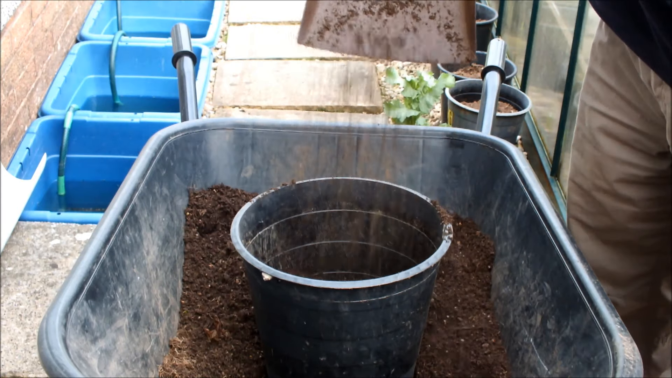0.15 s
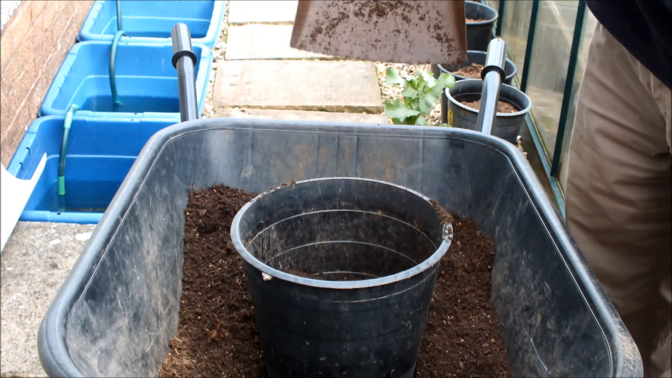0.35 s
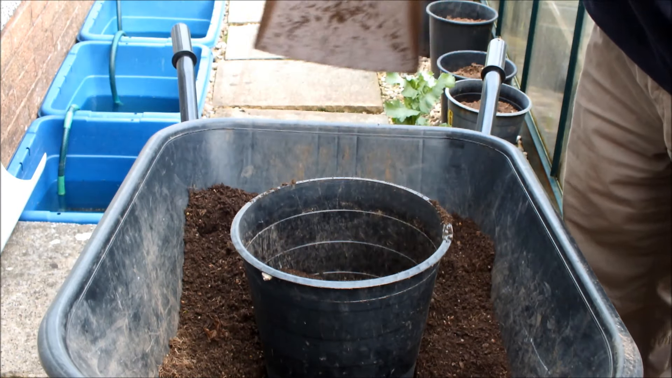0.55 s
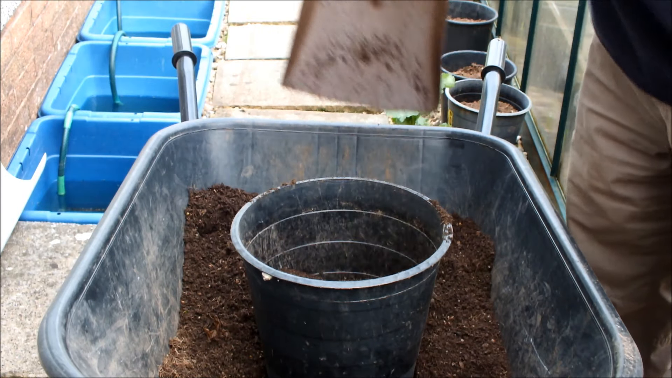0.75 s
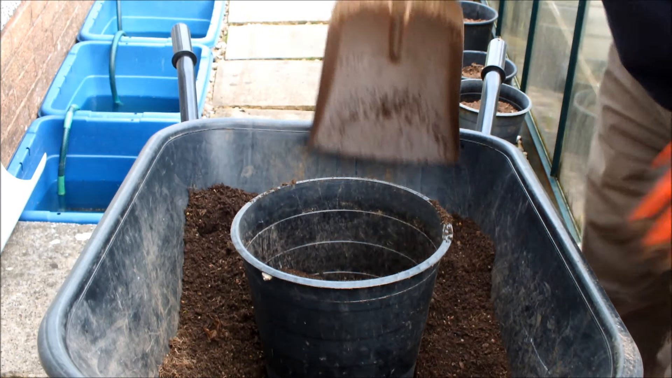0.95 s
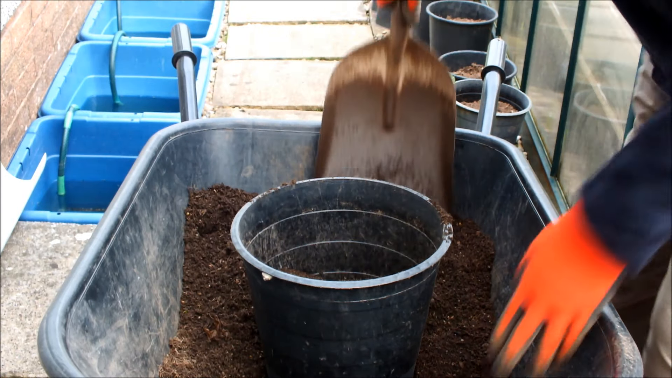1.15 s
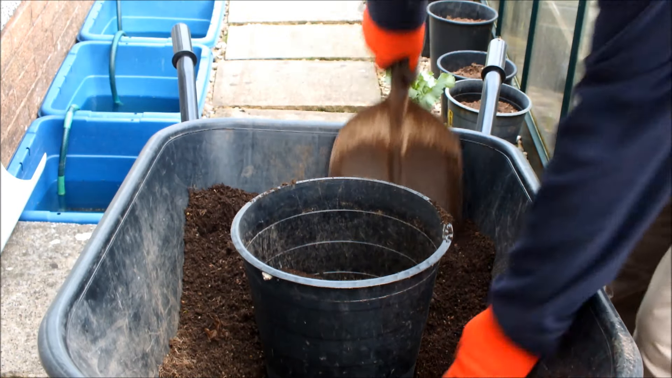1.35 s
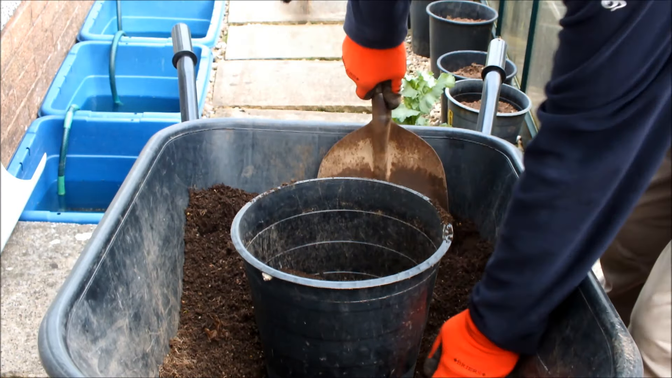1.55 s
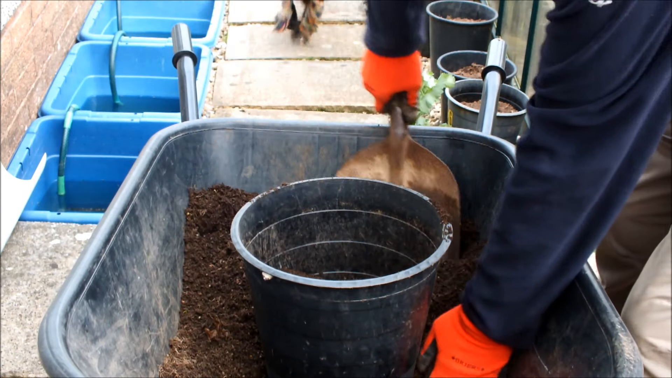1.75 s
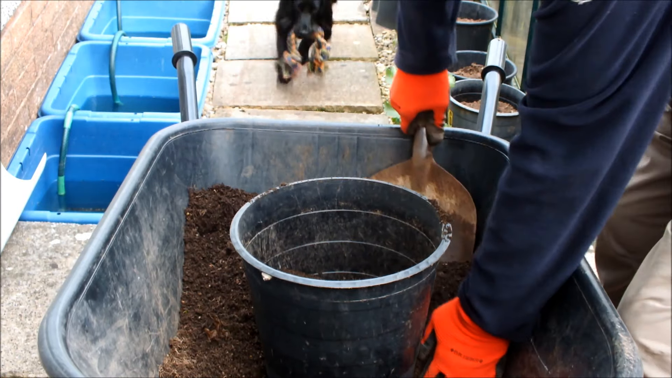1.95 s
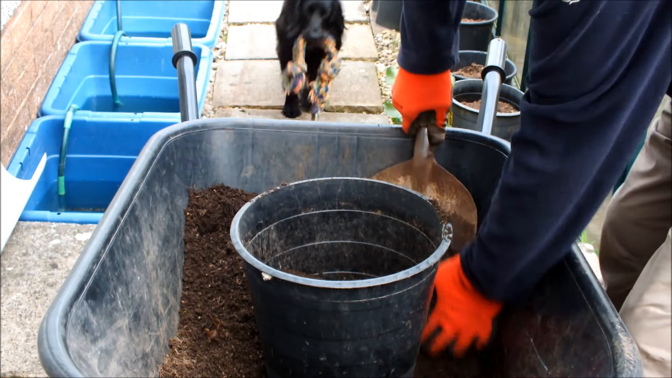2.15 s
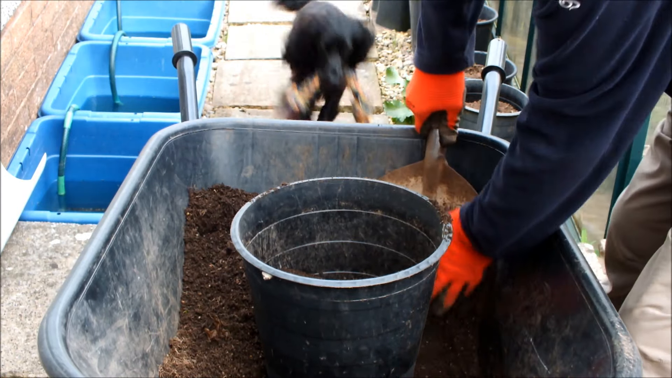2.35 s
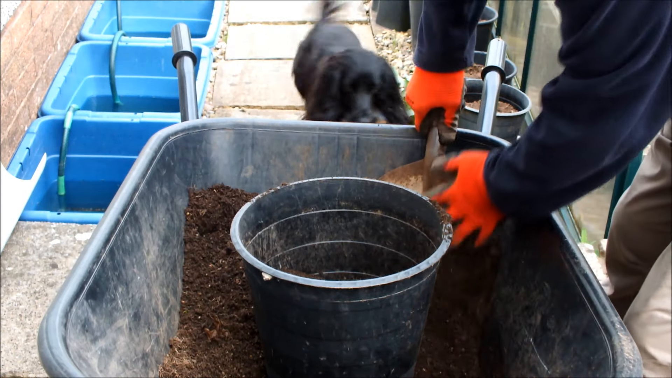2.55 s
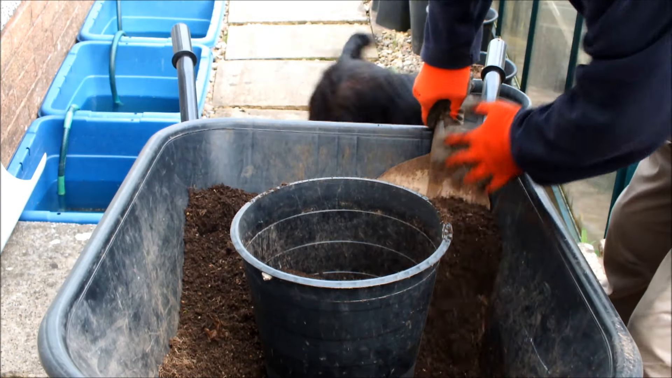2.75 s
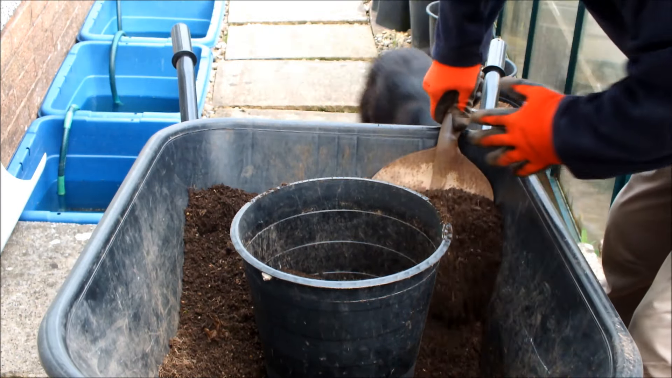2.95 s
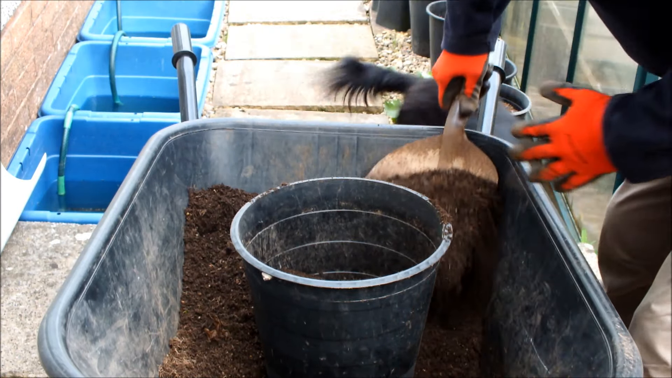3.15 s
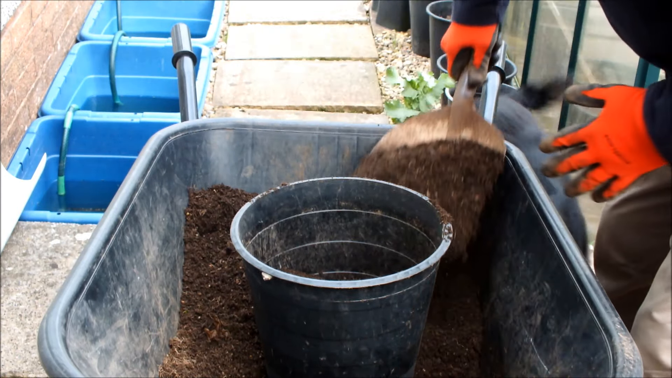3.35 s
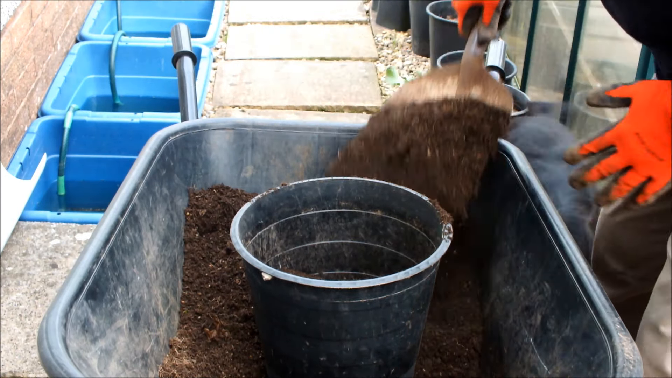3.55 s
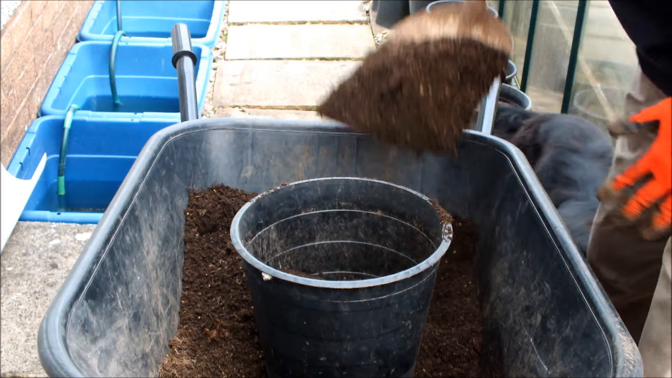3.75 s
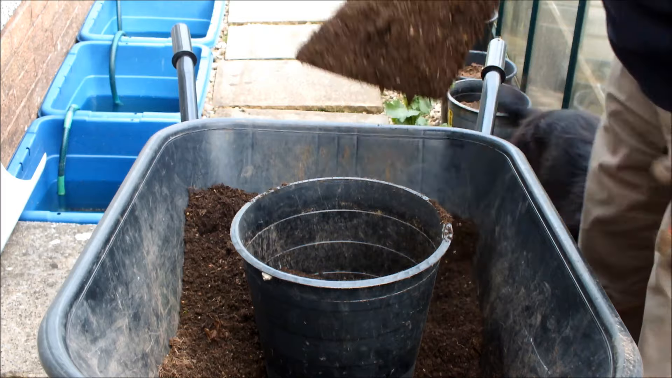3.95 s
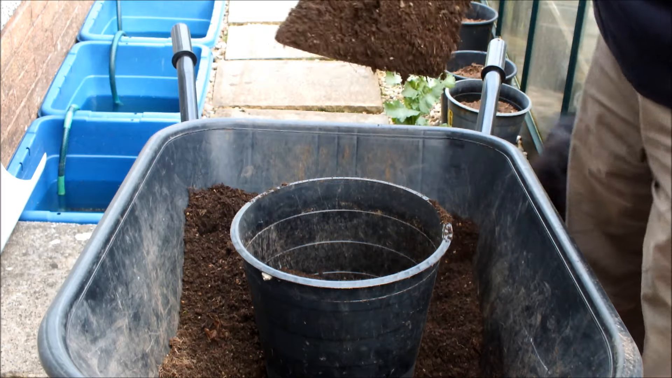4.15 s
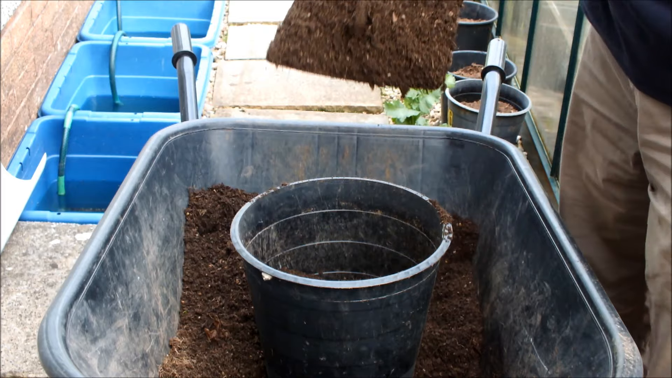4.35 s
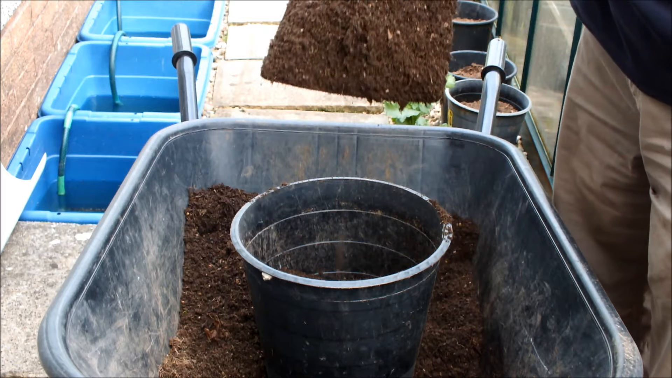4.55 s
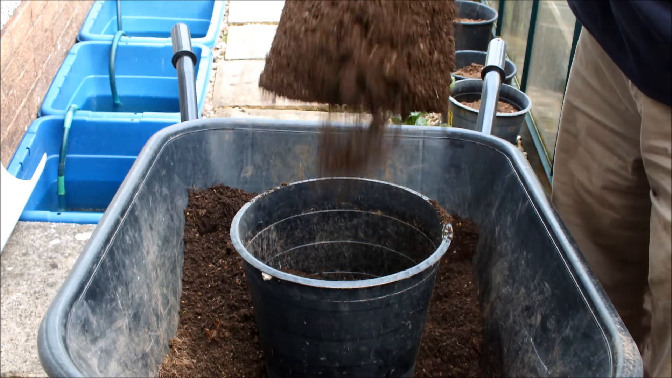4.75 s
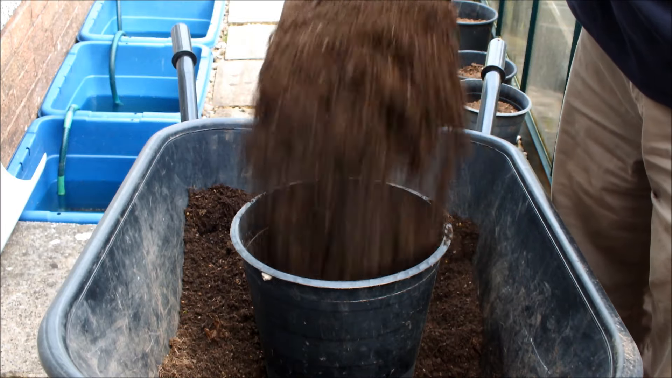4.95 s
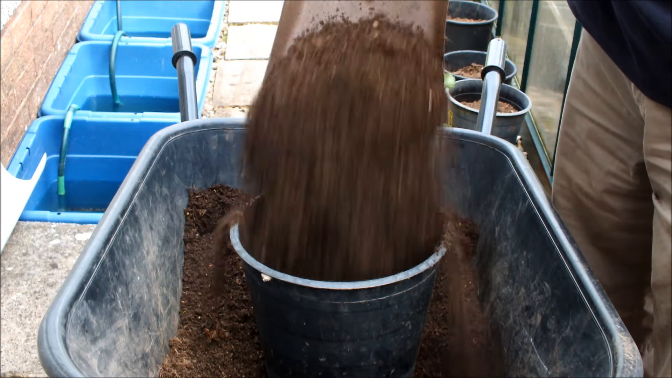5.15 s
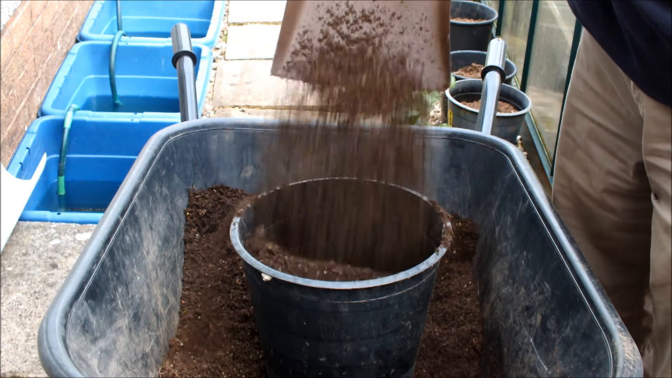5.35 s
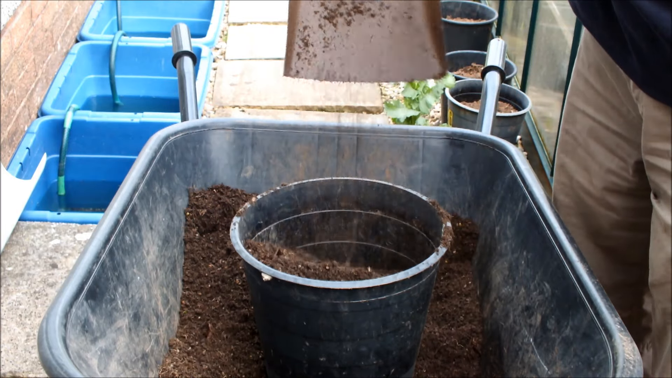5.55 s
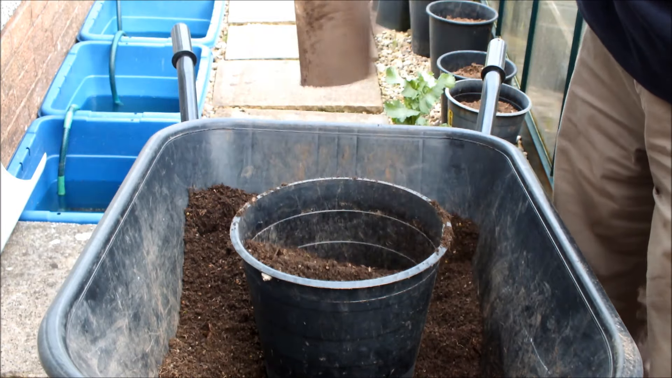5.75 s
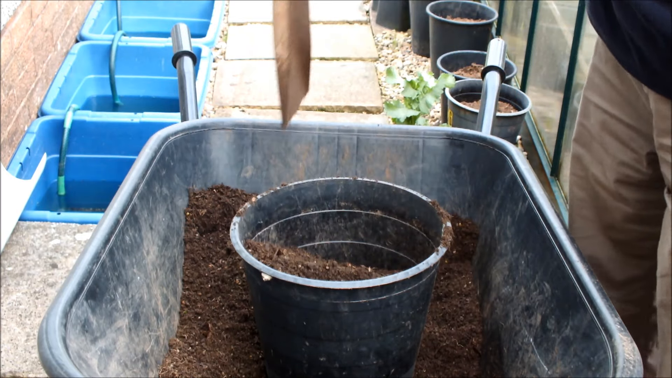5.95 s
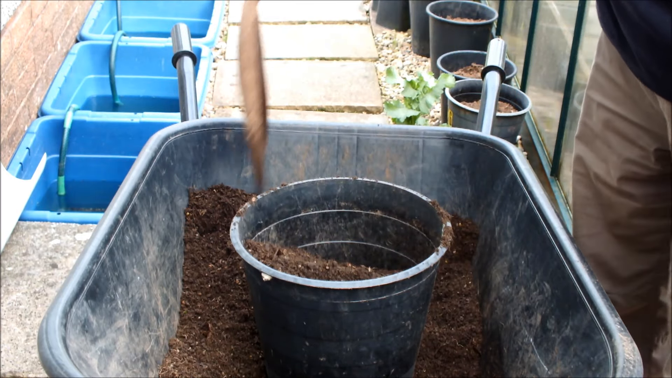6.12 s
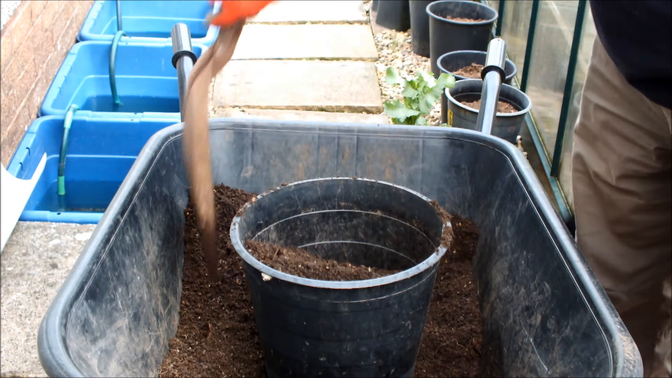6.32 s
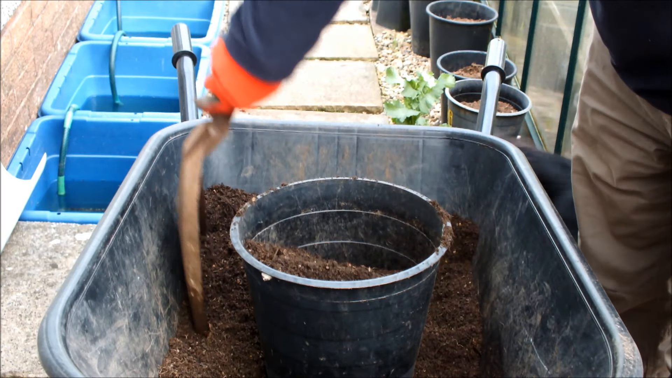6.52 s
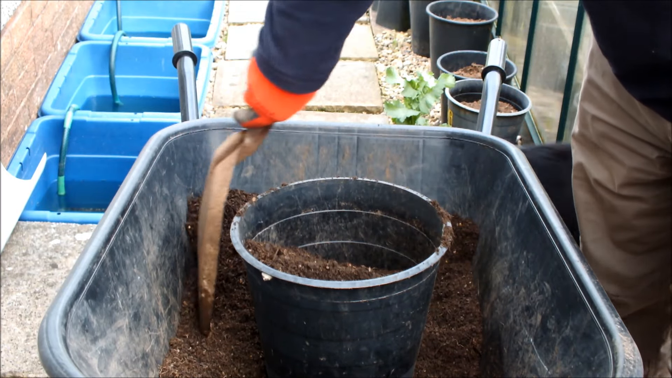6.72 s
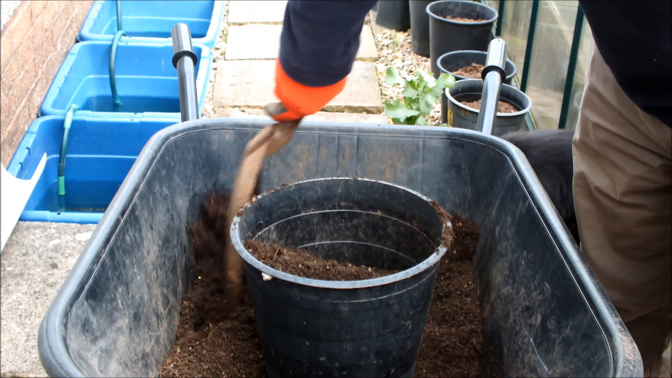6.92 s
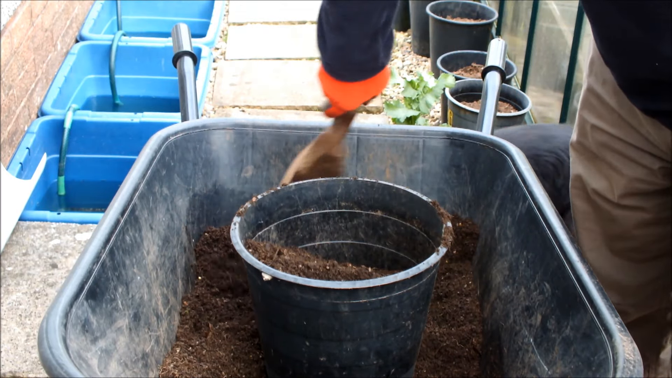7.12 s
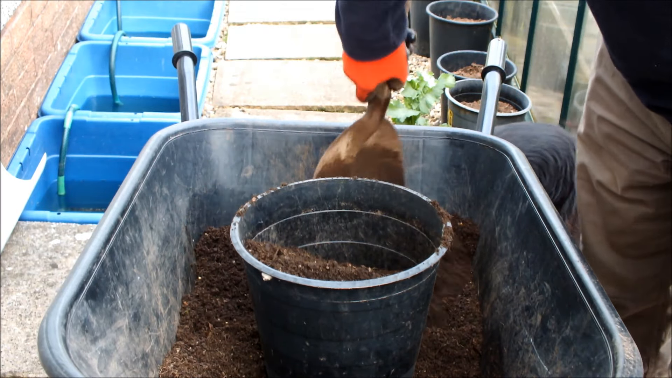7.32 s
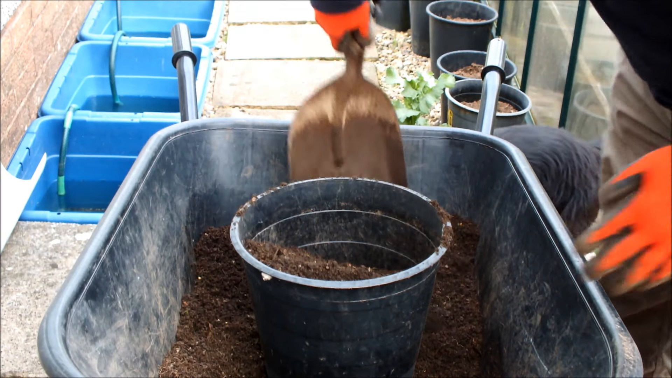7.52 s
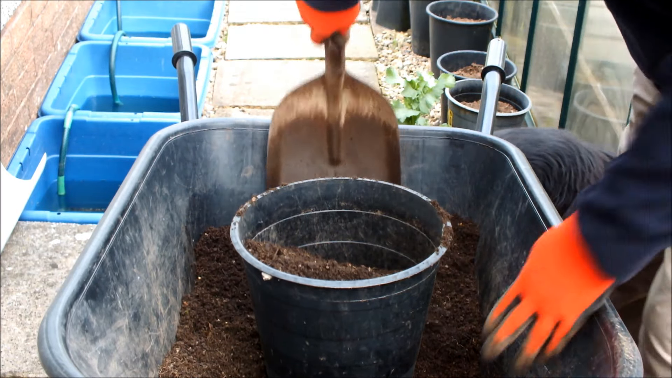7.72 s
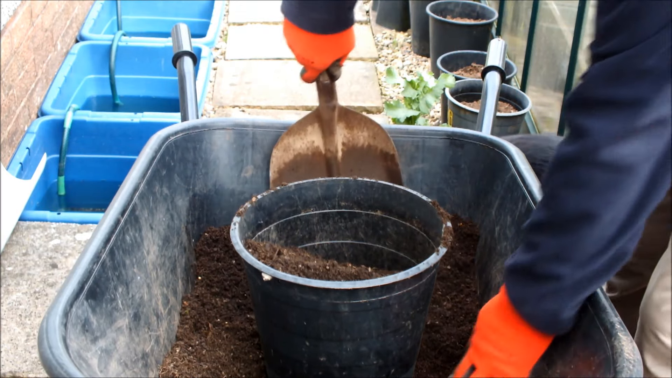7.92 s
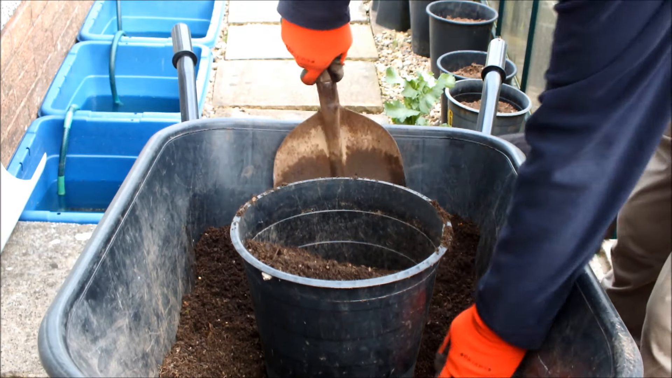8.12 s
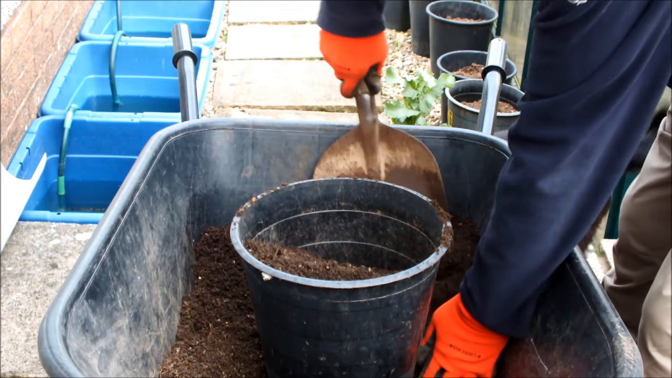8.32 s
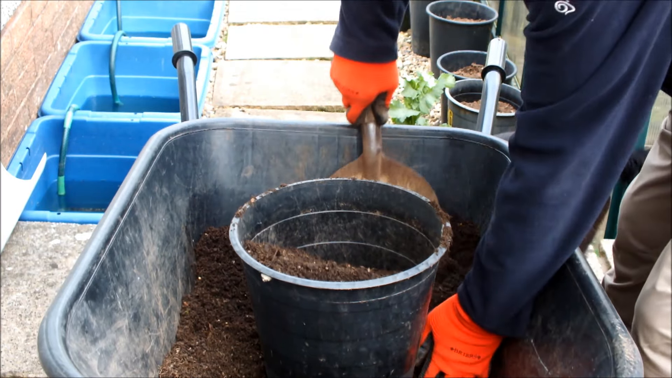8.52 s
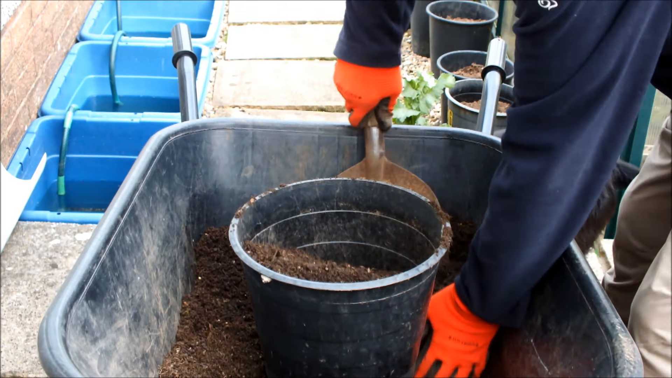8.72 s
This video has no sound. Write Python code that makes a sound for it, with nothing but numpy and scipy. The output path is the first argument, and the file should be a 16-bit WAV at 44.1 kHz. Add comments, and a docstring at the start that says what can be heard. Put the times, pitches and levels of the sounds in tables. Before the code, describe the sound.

Gritty compost pours into a hollow pot between bursts of metal blade knocking and rasping on a plastic tub, in a quiet garden.

```python
"""A load of soil slides off a steel hand shovel in a quiet garden and patters into a plastic pot: crumbs, lumps and clods.
Next the blade knocks on a plastic wheelbarrow and scrapes it: tiny stick-slip impulses drive the tub's resonances,
grit crunches under the edge, some slips lock into short groans and the steel rings briefly.
After about five seconds a second load pours into the pot, and then the blade knocks and scrapes again.
Impacts are random impulses filtered by bodies; a short scattered echo and soft wavering air surround them."""
import sys
import numpy as np
from scipy import signal
from scipy.fft import rfft, irfft, next_fast_len
from scipy.io import wavfile
from scipy.ndimage import uniform_filter1d, map_coordinates

SR = 44100
rng = np.random.default_rng(int(sys.argv[2]) if len(sys.argv) > 2 else 0)


def bounce(signal):
    """Save signal as a 16-bit WAV file at the path given by the first command-line argument."""
    frames = np.transpose(np.atleast_2d(signal))
    limited = np.clip(frames, -1, 1)
    pcm = np.round(limited * 32767).astype(np.int16)
    wavfile.write(sys.argv[1], SR, pcm)


N = 391608

# resonances of the loaded tub: (frequency [Hz], width [Hz], nominal lift [dB])
TUB_MODES = [(192.5, 42, 6.5), (296, 41, 6.5), (334, 41, -0.5), (450, 43, 0.5), (526, 28, 4),
             (557, 45, 1.5), (698, 20, 2.5), (818, 43, 9), (1010, 16, 9), (1280, 81, -2), (1462, 68, 1.5),
             (2510, 70, 4)]
# broad colour of fine grit and dust: (frequency [Hz], relative level [dB])
GRIT_COLOUR = [(800, -59), (2500, 9), (4200, 7.5), (6000, 2), (9000, 0.5), (12500, -2), (15000, -4.5),
               (16000, -39)]
# broad colour of hard grains that snap: (frequency [Hz], relative level [dB])
SNAP_COLOUR = [(300, 4), (1000, 2), (2000, 9.5), (4200, 2), (6000, 2.5), (9000, -1), (12500, -0.5),
               (16000, -11)]
# soil sliding off the tilted blade: (start of full flow [s], length of full flow [s], flow [dB],
# time to build up by 20 dB [s], time to trickle down by 20 dB, sign ignored [s], share on the heap [dB])
SOIL_SLIDES = [(-0.2, 0.2, -5.5, 0.2, 0.13, -3), (0.29, 0.14, -30.5, 7, 1.2, -13),
               (4.85, 0.08, -22, 0.12, -1, -9), (4.887, 0.0084, -4.5, 0.05, 0.22, -14),
               (5.066, 0.17, -0.4, 0.105, 0.3, 2.5)]


def scraping():
    """Stick-slip friction: each slip of the edge shakes tub and blade and crushes grit."""
    # colours of tub floor, tub wall and steel edge: (frequency [Hz], relative level [dB])
    floor_colour = [(25, -57), (122, -15.5), (172, 2), (240, -3.5), (370, 4), (480, 2), (800, -24),
                    (2000, -113)]
    wall_colour = [(120, -38), (330, -15.5), (480, 4), (720, 3.5), (1000, -14.5), (1400, -8), (3000, -83)]
    edge_colour = [(400, -32), (850, 7), (1100, 3.5), (1650, 3.5), (2600, -2), (3600, -15), (6000, -33),
                   (16000, -76)]
    # resonances of the steel blade: (frequency [Hz], width [Hz], lift [dB])
    blade_modes = [(1188, 42, 5.8), (1520, 45, 4.1), (1660, 52, 3.5), (1880, 39.74, 1.6), (2050, 50, 2.955),
                   (2500, 19, 1.3)]
    crunch_db, crackle_db = -5, -12.5  # single coarse grains, relative to rasp and to grit

    drum_gain, wall_gain, rasp_gain, grit_gain = pressing()
    grip = amp(1.3 * wobble(rate=60) + 0.24 * wobble(rate=35))  # the blade catches and lets go

    floor_slips = grains(rate=2500, spread_db=-0.9) * grip
    body = drum_gain * unit(through(floor_slips, ringing(floor_colour, TUB_MODES)))
    wall_slips = grains(rate=1800, spread_db=1.5) * grip
    body += wall_gain * unit(through(wall_slips, ringing(wall_colour, TUB_MODES)))
    steel = bending(ringing(edge_colour, blade_modes), lag=0.001933)
    edge_slips = grains(rate=2000, spread_db=-0.6) * grip
    body += rasp_gain * unit(through(edge_slips, steel))

    coarse = pips(rate=200, centre_hz=1513, octaves=0.537, cycles=11.7, spread_db=3)
    crunch = amp(crunch_db) * rasp_gain * coarse
    sand = unit(through(grains(rate=7000, spread_db=-2.0) * grip, ringing(GRIT_COLOUR)))
    snap = ringing(SNAP_COLOUR, [(12200, 8500, 20)])
    crackle = amp(crackle_db) * unit(through(grains(rate=140, spread_db=4.0), snap))
    return travelling(body) + crunch + grit_gain * (sand + crackle)


def pressing():
    """Load-dependent friction: gains of floor, wall, edge and grit grow with force, the largest winning."""
    # pushes of the blade; a deep one drums on the tub floor, a shallow one rasps with the edge:
    # (start [s], length [s], force [dB], change of force over the push [dB], depth [dB], grittiness [dB])
    pushes = [(1.256, 0.16, 8, -11.5, 1.5, 4), (1.373, 0.12, 7.5, -2.5, -1, 1),
              (1.624, 0.047, 8.5, -2, 3.5, -5), (1.693, 0.053, 0.5, -6, 4, -7.5),
              (1.77, 0.16, 6, -5.5, 2, -2.5), (1.994, 0.17, -17.5, 14, -3.5, 3),
              (2.126, 0.21, -13.5, 3.5, 1, 1), (2.858, 0.12, -7, -14, 2.5, -9),
              (2.987, 0.11, -18.5, 0.5, -0.5, -8), (3.157, 0.036, -17.5, -2, -1, 0),
              (3.201, 0.06, -6.5, 2, 3, -11), (3.295, 0.087, -11.5, -6.5, 1, -4),
              (6.44, 0.10535, -14.5, 6, -0.5, 3), (6.534, 0.062, 1, -3.5, -3.5, 3.5),
              (6.623, 0.063, -13.5, -4, -1, -7), (6.73, 0.34, -24, 7.5, -4.5, 1.5),
              (7.007, 0.092, 2, -8, -1.5, -0.5), (7.11, 0.14, 7, -11, -1, -2),
              (7.293, 0.29, -31.5, 10.5, -6, -0.5), (7.643, 0.036, -5, -12, 0, -7),
              (7.696, 0.087, -3.5, 6, 1.5, -0.5), (7.815, 0.041, -4.5, -6, -1.5, 7.5),
              (7.871, 0.095, 2, -10.5, -1.5, 8), (7.97, 0.081, -6.5, -5.5, 0, 5.5),
              (8.04, 0.058, -3.5, 1, 1.5, 2.5), (8.102, 0.11, -9.5, 9, -5, 5),
              (8.2, 0.046, 11.5, -3.5, 1, 2), (8.257, 0.043, 10, -8.5, 3, -1),
              (8.315, 0.1533, 2, -3, 1.5, -3), (8.428, 0.065, 1.5, 5, -0.5, -1),
              (8.492, 0.14, 5.5, -10.5, 2, 0.5), (8.716, 0.1, -14.5, -4, -4, 3.5)]
    rise, fall = 845, 575  # dB per second: the blade takes hold and comes to rest
    settle_db, settle_fall = -15, 113  # soil shifting around a push: relative force [dB], fade [dB/s]
    drum_db, wall_db, rasp_db, grit_db = -45.5, -43.5, -46.3, -55.5  # at a force of 0 dB
    drum_grows, rasp_grows, grit_grows = 0.67, 0.93, 0.71  # dB for each dB of force

    levels = np.full((4, N), -np.inf)
    for s, length, db, change_db, depth_db, grittiness_db in pushes:
        push = stroke(s, length, db, change_db, rise, fall)
        settling = stroke(s, length, db + settle_db, change_db, 2 * settle_fall, settle_fall)
        force = np.maximum(push, settling)
        levels = np.maximum(levels, [
            drum_db + drum_grows * force + depth_db,
            wall_db + force,
            rasp_db + rasp_grows * force - depth_db,
            grit_db + grit_grows * force + grittiness_db])
    return amp(levels)


def travelling(x, knot_hz=75, knot_s=0.05, size=1024):
    """Moving excitation point: as the edge travels it drives ever different resonances harder."""
    place_db = 3.0  # how much the strength of each frequency region depends on place
    hz, t, spectrum = signal.stft(x, SR, nperseg=size)
    knots = rng.standard_normal((256, 512))
    grid = np.meshgrid(hz / knot_hz, t / knot_s, indexing="ij")
    field = map_coordinates(knots, grid, order=1, mode="wrap")
    gain = unit(amp(place_db * unit(field)))
    return signal.istft(spectrum * gain, SR, nperseg=size)[1][:, :N]


def judder(waver_hz=20):
    """Mode-locked stick-slip: slips lock to one resonance of the tub and give a short rough groan."""
    # the edge catches on the tub's wall (high) or floor (low):
    # (start [s], length [s], level [dB], change of level [dB], mean pitch [Hz])
    catches = [(1.76, 0.14, -41, -16, 186), (1.855, 0.085, -41, -3, 335), (3.256, 0.052, -47, -4, 156.7),
               (7.04, 0.098, -46, 8, 679.6), (7.216, 0.033, -44, 5.5, 700), (8.195, 0.07, -38, -7, 188),
               (8.22, 0.04152, -39.5, 0, 345.4), (8.347, 0.04045, -38, -6, 186),
               (8.465, 0.1, -47, 2.5, 334.7)]
    drift = waver_hz * wobble(rate=110)
    rough = amp(1.8 * wobble(rate=60))
    groan = np.zeros(N)
    for s, length, db, swell_db, hz in catches:
        phase = 2 * np.pi * np.cumsum(hz + drift) / SR
        tone = unit(np.sin(phase) * rough)
        groan += tone * amp(stroke(s, length, db, swell_db, rise=499, fall=700))
    return np.array([groan, np.zeros(N)])


def blade(size=8192):
    """Damped free vibration: rubbing noise drives the steel, which dies away quickly in the soil."""
    # pitch is set by how deep the blade sits: (start [s], driven for [s], nominal peak [dB], pitch [Hz])
    rings = [(1.44, 0.038, -25, 1500), (7.003, 0.02, -29, 2110), (7.118, 0.065, -29, 1620),
             (7.11, 0.065, -33, 2660), (7.112, 0.076, -40, 3380), (7.725, 0.008, -30.5, 2120),
             (7.806, 0.019, -33, 1880), (7.81, 0.036, -37, 1700), (7.866, 0.023, -37, 2930),
             (8.026, 0.012, -35, 2330), (8.44, 0.08, -30, 1660)]
    t60, release = 0.025, 1200  # decay by 60 dB [s], fade of the rubbing [dB/s]
    track = np.zeros((2, N))
    t = np.arange(size) / SR
    for s, length, db, hz in rings:
        rub = rng.standard_normal((2, size)) * amp(-release * np.maximum(t - length, 0))
        ring = np.sin(2 * np.pi * hz * t) * amp(-60 * t / t60)
        add(track, s, db, through(rub, ring))
    return track


def knocks():
    """Impact excitation of modes: where the blade lands decides between boom and clack."""
    # blade against tub; each spot favours one note:
    # (time [s], nominal peak [dB], boom [dB], clack [dB], note [Hz], note lift [dB])
    strikes = [(1.179, -7.5, -4.5, 3.5, 1330, 14), (1.193, -14, -5, 12.5, 534, 7),
               (1.245, -16.5, 0.5, 7, 530, 11), (1.332, -16.5, -23, 9.5, 1707, 1),
               (1.339, -18, -23, -4, 1911, 7), (1.447, -21.5, -21, 19, 1540, 12),
               (1.487, -18, 0, -31, 600, 15), (1.753, -24, -5, 10, 330, 3),
               (1.908, -21, -17, -24.5, 510, 10), (2.484, -40, -7, 8, 600, -2),
               (2.843, -25, 0, -1.5, 500, -14), (3.03, -32.5, 6, 10, 780, 4),
               (3.078, -32.5, -1, 11, 1130, 9), (3.178, -34, -20, 4, 780, 3),
               (3.203, -25.5, -13, -15, 764.3, 5), (3.292, -34, 4, 1, 2260, 21),
               (3.727, -36.5, -4, 14, 1100, 8), (7.006, -14, -16, -4, 347, 14.5),
               (7.108, -17, -23, 2, 684, 2), (7.217, -21, -10, -17, 600, 11),
               (7.248, -20, -13, -9, 720, 17), (7.624, -19.5, -20, 3.5, 644, 4.5),
               (7.699, -18.5, -5, 13, 591.2, 8.5), (7.726, -20, 1, -1, 1260, 16),
               (7.75, -23, -4, 6, 463, 21), (7.761, -25, 10, 25, 620, -1), (7.804, -21, 1, -0.5, 980, 19),
               (7.828, -29, -3, 0, 980, 14), (7.859, -21, -9, 9, 710, 16), (8.027, -25, 2, 11, 900, 10),
               (8.073, -26.5, -4, 8, 1580, 13), (8.193, -23, -14, 12, 700, 11.5),
               (8.331, -16.5, -3, 2, 565, 6), (8.509, -20, -9, -18, 329.2, 17)]
    # broad colour of a blow on the tub: (frequency [Hz], relative level [dB])
    blow_colour = [(25, -24), (80, 2), (170, 4.5), (300, 4.5), (550, 8.5), (950, -2.5), (1500, -6),
                   (1900, -12), (2700, -17), (4500, -32), (6000, -39), (16000, -45)]
    # the blade bottoms out and the whole tub booms, at a pitch set by the load:
    # (time [s], nominal peak [dB], pitch [Hz])
    thumps = [(1.186, -21, 212), (1.752, -30, 195), (3.243, -37, 155), (3.291, -39, 152), (6.433, -41, 161),
              (7.629, -28, 192), (7.694, -21, 217), (7.728, -26.5, 200), (8.193, -31, 181),
              (8.329, -22, 214)]
    # broad colour of the whole tub flexing: (frequency [Hz], relative level [dB])
    flex_colour = [(25, -26), (60, -24), (100, -4), (130, -4), (190, -1), (280, -24.5), (700, -92)]
    place_db, note_width = -3, 0.3  # scatter of each lift from knock to knock, width as a share of pitch

    track = np.zeros((2, N))
    for s, db, boom_db, clack_db, note_hz, note_db in strikes:
        modes = [(hz, width, lift + place_db * rng.standard_normal()) for hz, width, lift in TUB_MODES]
        modes.append((note_hz, note_width * note_hz, note_db))
        tub = bending(ringing(blow_colour, modes), lag=0.000873)
        place = ringing([(130, boom_db), (600, 0), (2200, clack_db)])
        knock = through(contact(t60=0.032, rattle=1.0), tub)
        add(track, s, db, through(knock, place), crest_db=12)
    for s, db, hz in thumps:
        boom = ringing(flex_colour, [(hz, 16, 12)])
        add(track, s, db, through(contact(t60=0.13, rattle=0.8), boom), crest_db=13.5)
    return track


def pouring():
    """Granular impact noise: crumbs rain on soft heap and bare pot, lumps clack and clods land dully."""
    # colours of the bare pot and the soft heap: (frequency [Hz], relative level [dB])
    pot_colour = [(200, -24), (700, 4.5), (1100, 6.5), (1700, 10), (2500, 8.5), (3300, 1), (4800, -6.5),
                  (7500, -15), (15000, -64)]
    heap_colour = [(40, -37), (120, -14.5), (230, -12.5), (370, -1), (750, -5), (1300, -11), (2700, -55)]
    # resonances of the pot: (frequency [Hz], width [Hz], lift [dB])
    pot_modes = [(404, 68, 6.6), (1580, 210, 4.7), (2003, 81, 5.9), (2190, 60, 5.9), (2550, 100, 4.075)]
    # largest lumps that hit the pot, each spot with its own note:
    # (time [s], nominal peak [dB], note [Hz], time to break up, as a 60 dB decay [s])
    lumps = [(0.0292, -32.5, 2300, 0.014), (0.059, -27.5, 2500, 0.018), (0.094, -31.5, 2100, 0.021),
             (0.166, -39, 2000, 0.02), (0.1801, -30.5, 1900, 0.012), (0.187, -27, 1850, 0.017),
             (0.2056, -36.5, 2100, 0.016), (4.889, -32, 1900, 0.049), (4.998, -31, 1650, 0.01),
             (5.0523, -29.5, 1960, 0.033), (5.079, -29, 1680, 0.025), (5.1188, -22, 2560, 0.018),
             (5.232, -26, 1900, 0.0091), (5.239, -18, 2070, 0.02), (5.2563, -18, 1590, 0.02),
             (5.3651, -29, 1570, 0.03), (5.479, -38, 1500, 0.013), (5.5274, -37, 2100, 0.01),
             (5.539, -28.5, 1630, 0.035), (5.567, -32.5, 1800, 0.014), (5.663, -37.5, 2300, 0.014)]
    # soft clods that land on the heap: (time [s], nominal peak [dB])
    clods = [(0.013, -24), (5.18, -34), (5.311, -34), (5.384, -32), (5.427, -40), (5.456, -34),
             (5.711, -40.5)]
    thud_db, patter_db, dust_db, crumb_db = -48, -44, -54, -51.5  # at a flow of 0 dB
    # dB for each dB of flow: patter, dust and single larger crumbs all fade more slowly than the stream, # so
    # single larger crumbs stand out as the stream thins
    patter_grows, dust_grows, crumb_grows = 0.74, 0.65, 0.54
    note_db, note_width = 8, 0.3  # lift of a lump's own note, width as a share of pitch

    falling = flow(lag=0).max(axis=0)
    heap_share = amp([heap_db for *_, heap_db in SOIL_SLIDES])
    landing = heap_share @ flow(lag=0.1)  # the heap has to form before soil thuds on it
    clumps = amp(2.76 * wobble(rate=88))  # soil leaves the blade in clumps
    pot, heap = ringing(pot_colour, pot_modes), ringing(heap_colour, pot_modes)

    thuds = unit(through(grains(rate=1500, spread_db=3.0) * clumps, heap))
    track = amp(thud_db) * landing * thuds
    patter = unit(through(grains(rate=2100, spread_db=1.0) * clumps, pot))
    track += amp(patter_db) * falling ** patter_grows * patter
    dust = unit(through(grains(rate=7600, spread_db=2.5) * clumps, ringing(GRIT_COLOUR)))
    track += amp(dust_db) * falling ** dust_grows * dust
    crumbs = pips(rate=220, centre_hz=1475, octaves=0.683, cycles=14, spread_db=4.5)
    track += amp(crumb_db) * falling ** crumb_grows * crumbs

    for s, db, note_hz, t60 in lumps:
        spot = ringing(pot_colour, pot_modes + [(note_hz, note_width * note_hz, note_db)])
        add(track, s, db, through(contact(t60, rattle=1.2), spot))
    for s, db in clods:
        add(track, s, db, through(contact(t60=0.042, rattle=0.86), heap))
    return track


def flow(lag):
    """Exponential growth and decay: gain of each slide of soil, lag seconds after it leaves the blade."""
    return amp([stroke(s + lag, length, db, 0, 20 / abs(build), 20 / abs(trickle))
                for s, length, db, build, trickle, _ in SOIL_SLIDES])


def ticks():
    """Contact hardness: hard bits of grit that snap or skip give short clicks, bright or dull."""
    # (time [s], nominal peak [dB], brightness at 8 kHz relative to 2 kHz [dB])
    clicks = [(0.3364, -47, -2), (0.36, -49, 1), (0.4683, -47, -28), (1.3297, -24, -17),
              (1.337, -27.5, 4.5), (1.721, -36, 0), (1.874, -32.5, -3), (2.371, -42.5, 1),
              (2.483, -40.5, 12), (3.074, -50, 4), (3.205, -39, -15), (4.6586, -46.5, 5), (5.0503, -29, -8),
              (5.203, -33, 2), (5.478, -34.5, -6), (5.541, -33, -1), (5.688, -39, -1), (6.223, -48, -2),
              (6.9285, -42.5, -9), (7.006, -30, -3.5), (7.29, -35, -16), (7.3135, -36.5, -16),
              (7.3362, -36.5, -12.5), (7.702, -34.5, 11), (7.731, -31.5, 11), (8.3189, -27.5, -4)]
    track = np.zeros((2, N))
    snap = ringing(SNAP_COLOUR)
    for s, db, bright_db in clicks:
        hardness = ringing([(2000, 0), (8000, bright_db)], size=512)
        click = through(contact(t60=0.021, rattle=2.1), snap)
        add(track, s, db, through(click, hardness))
    return track


def surroundings(x, t60=0.23, size=12000):
    """Diffuse reflection: tub walls and paving give a short scattered answer."""
    t = np.arange(size) / SR
    tail = rng.standard_normal((2, size)) * amp(-60 * t / t60) * (t > .003)
    return signal.fftconvolve(x, tail / np.linalg.norm(tail[0]), axes=1)[:, :N]


def garden():
    """Broadband ambient noise: soft outdoor air, as filtered noise whose level wavers a little."""
    # colour of the open air: (frequency [Hz], relative level [dB])
    air_colour = [(15, -52), (25, -13), (174, -1.5), (216, -2), (255, -0.5), (291, 1), (834, -2.5),
                  (981, -5), (1390, -7), (1730, -9), (2260, -11), (5090, -20), (5820, -23.5),
                  (14200, -34.5), (15800, -54)]
    # faint peaks in the hiss: (frequency [Hz], width [Hz], lift [dB])
    air_peaks = [(992, 57, 6), (1767, 98, 6.5)]
    air = unit(through(rng.standard_normal((2, N)), ringing(air_colour, air_peaks)))
    return amp(-59.0 + 0.48 * wobble(rate=9.8)) * air


def amp(db):
    """Decibel law: level to amplitude ratio."""
    return 10 ** (np.asarray(db) / 20)


def unit(x):
    """Normalisation to an rms value of one."""
    return x / np.sqrt(np.mean(x ** 2) + 1e-20)


def along(points, hz):
    """Logarithmic frequency scale: interpolates (frequency [Hz], value) points."""
    f, v = np.transpose(points)
    return np.interp(np.log(hz + 1), np.log(f + 1), v)


def wobble(rate):
    """Slow random modulation: a smooth curve with rate random knots a second."""
    knots = rng.standard_normal(2048)
    return map_coordinates(knots, [np.arange(N) * rate / SR], mode="wrap")


def stroke(start, length, db, change_db, rise, fall):
    """Linear-in-decibel envelope: rise, hold with a steady change, fall; slopes in dB a second."""
    drop = 120  # dB below the stroke at both ends
    end = start + length
    times = [start - drop / rise, start, end, end + drop / fall]
    levels = [db - drop, db, db + change_db, db + change_db - drop]
    return np.interp(np.arange(N) / SR, times, levels)


def grains(rate, spread_db):
    """Random impulse train: rate tiny impacts a second, sizes spread exponentially in dB."""
    size = amp(spread_db * np.minimum(rng.standard_exponential(N), 5))
    hits = rng.random(N) < rate / SR
    return unit(hits * size * rng.standard_normal((2, N)))


def pips(rate, centre_hz, octaves, cycles, spread_db, count=4000, size=400):
    """Poisson process of damped sines: each grain rings at its own pitch, -60 dB after some cycles."""
    start = (np.cumsum(rng.standard_exponential(count)) * SR / rate).astype(int)
    inside = start < N
    pitch, strength, side = rng.standard_normal((count, 3))[inside].T[:, :, None]
    hz = centre_hz * 2 ** (octaves * np.clip(pitch, -2, 2))
    turns = hz * np.arange(size) / SR
    decay = amp(spread_db * np.minimum(strength, 2) - 60 * turns / cycles)
    pip = np.sin(2 * np.pi * turns) * (1 - np.exp(-2 * turns)) * decay
    at = (start[inside, None] + np.arange(size)).ravel()
    return unit(np.array([np.bincount(at, part.ravel(), N)[:N] for part in (pip, pip * side)]))


def contact(t60, rattle, size=6000):
    """Impulsive contact force: one push with a dying rattle of smaller contacts."""
    t = np.arange(size) / SR
    chatter = rng.standard_normal((2, size)) * amp(-60 * t / t60) * (1 - np.exp(-t / 0.002))
    force = rattle * unit(chatter) / np.sqrt(size)
    force[0, 0] += 1
    # the near wall throws the push sideways a moment later
    force[1, rng.integers(8, 40)] += 1
    return force


def ringing(colour, modes=(), size=8192):
    """Minimum-phase response: causal impulse response of a broad colour with resonances on top."""
    hz = np.fft.rfftfreq(size, 1 / SR)
    db = along(colour, hz)
    db = db + sum(lift / (1 + (2 * (hz - f) / width) ** 2) for f, width, lift in modes)
    # folding the cepstrum onto positive time makes the response causal
    cepstrum = irfft(np.log(amp(db)))
    cepstrum[1:size // 2] *= 2
    cepstrum[size // 2 + 1:] = 0
    return irfft(np.exp(rfft(cepstrum)))[:size // 2]


def bending(response, lag):
    """Dispersion of bending waves in a thin wall: low notes arrive later, lag seconds at 1 kHz."""
    size = 2 * len(response)
    hz = np.fft.rfftfreq(size, 1 / SR)
    phase = 4 * np.pi * lag * np.sqrt(1000 * hz)
    return irfft(rfft(response, size) * np.exp(-1j * phase))[:len(response)]


def through(force, response):
    """Linear superposition: the sound of a body driven by a pair of forces, by convolution."""
    return signal.oaconvolve(force, response[None], axes=1)[:, :force.shape[1]]


def add(track, s, db, sound, crest_db=11.5, size=180):
    """Crest factor: the loudest size samples (rms, first channel) lie crest_db below the nominal peak."""
    loudest = np.sqrt(uniform_filter1d(sound[0] ** 2, size, mode="constant").max())
    room = track[:, max(round(s * SR), 0):][:, :sound.shape[1]]
    room += amp(db - crest_db) * sound[:, :room.shape[1]] / loudest


def stereo(pair, likeness):
    """Interaural coherence: a middle and a side signal set left-right correlation by frequency."""
    # (frequency [Hz], left minus right [dB])
    lean_points = [(150, 1), (600, 1), (1100, 1.5), (2400, -3), (4500, 1), (8500, -1), (13000, -0.5)]
    size = next_fast_len(N + 4096)
    hz = np.fft.rfftfreq(size, 1 / SR)
    # equally strong unrelated inputs give a correlation of cos(2 * turn)
    turn = np.arccos(np.clip(along(likeness, hz), -.8, 1)) / 2
    mid, side = rfft(pair, size) * [np.ones_like(hz), np.tan(turn)]
    lean = amp(along(lean_points, hz) / 2)
    return irfft([(mid + side) * lean, (mid - side) / lean], size)[:, :N]


def scene():
    """Superposition of sources: the work close by, its short echo and the garden around it."""
    # left-right likeness of near sounds and of the open air: (frequency [Hz], target correlation)
    near_likeness = [(600, 0.97), (1100, 0.69), (1550, 0.74), (2200, 0.18), (3400, -0.1007), (4300, 0.17),
                     (5500, -0.17), (8500, 0.084), (11000, 0.63), (15000, 0.85)]
    far_likeness = [(60, 0.12), (200, 0.19), (700, 0.3), (2000, -0.055), (5000, -0.38), (7500, -.35),
                    (11000, 0.936)]
    work = scraping() + judder() + blade() + knocks() + pouring() + ticks()
    close = work + amp(-8.5) * surroundings(work)
    return stereo(close, near_likeness) + stereo(garden(), far_likeness)


def record(dry):
    """Band limitation: an ideal low-pass keeps only what lies below the top frequency."""
    top_hz = 15830
    size = next_fast_len(N + SR // 2)
    passed = np.fft.rfftfreq(size, 1 / SR) < top_hz
    return irfft(rfft(dry, size) * passed, size)[:, :N]


dry = scene()
out = record(dry)
bounce(out)
```